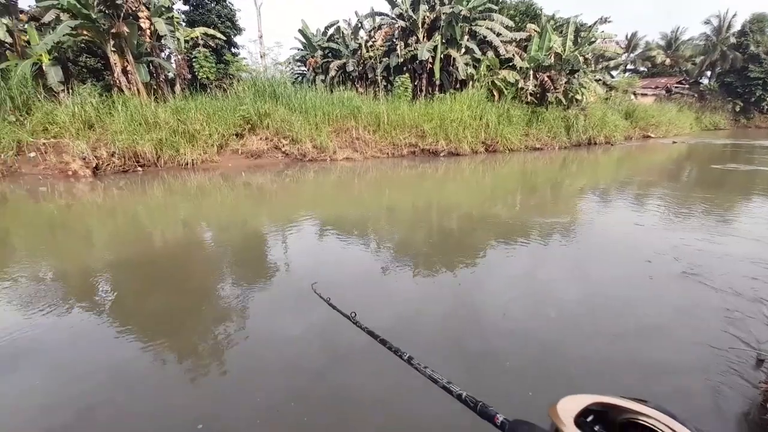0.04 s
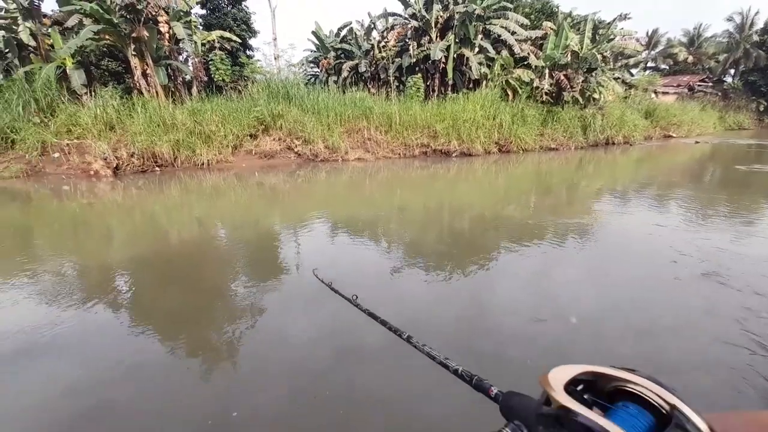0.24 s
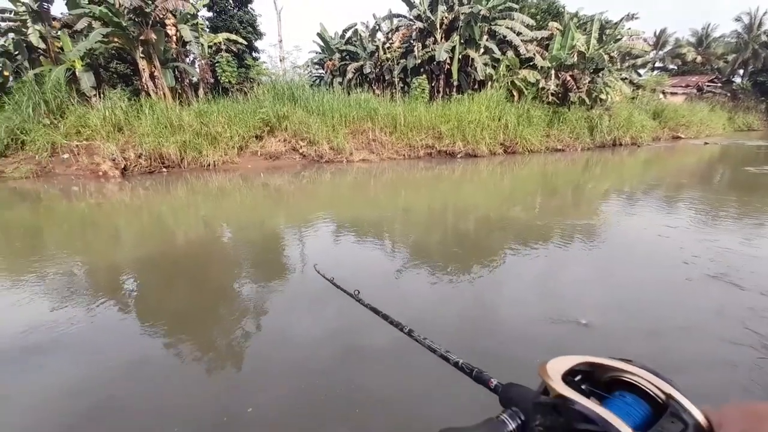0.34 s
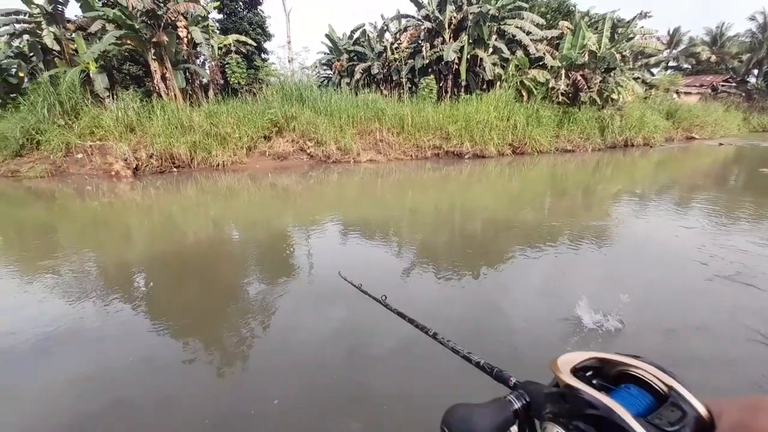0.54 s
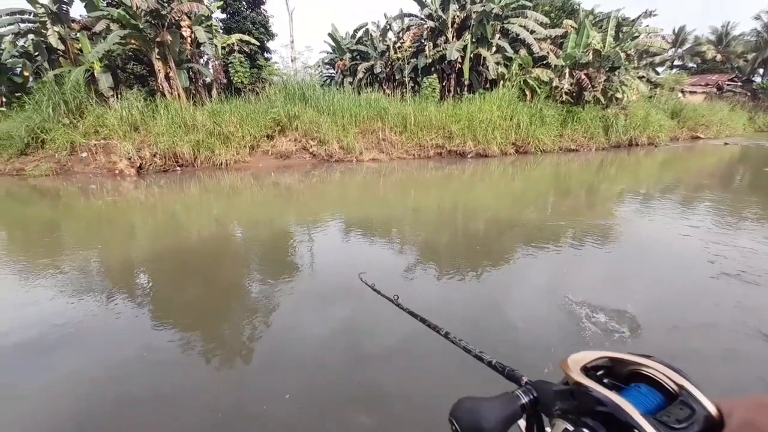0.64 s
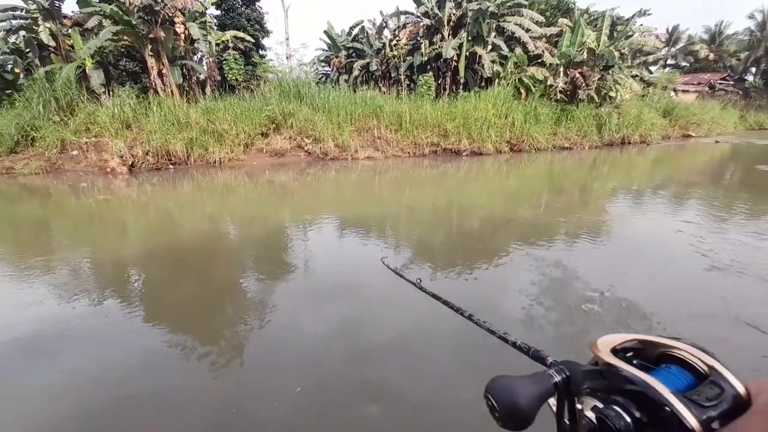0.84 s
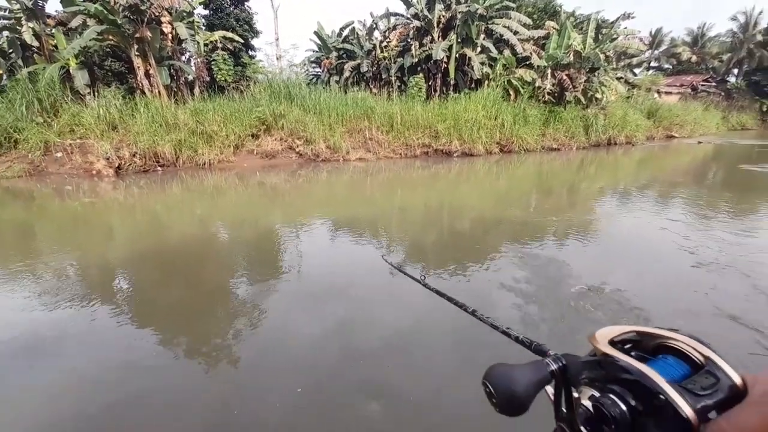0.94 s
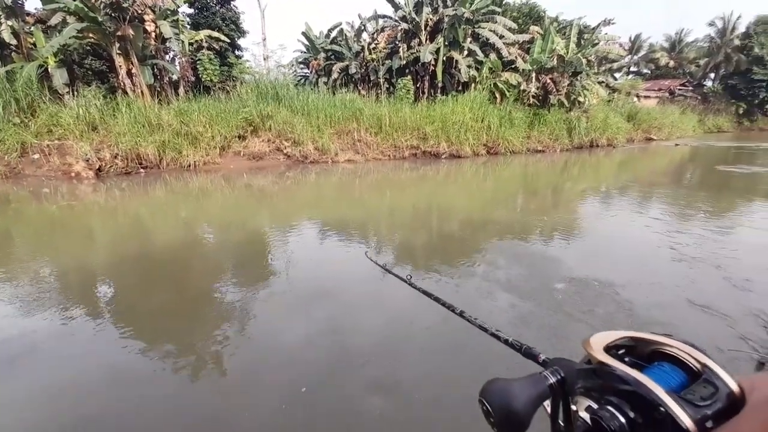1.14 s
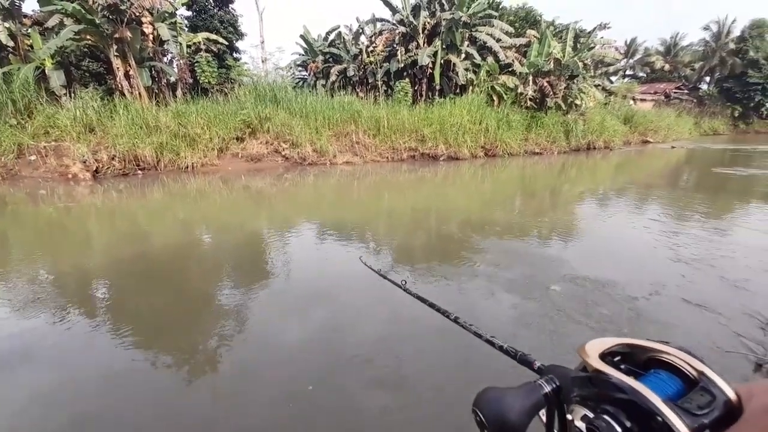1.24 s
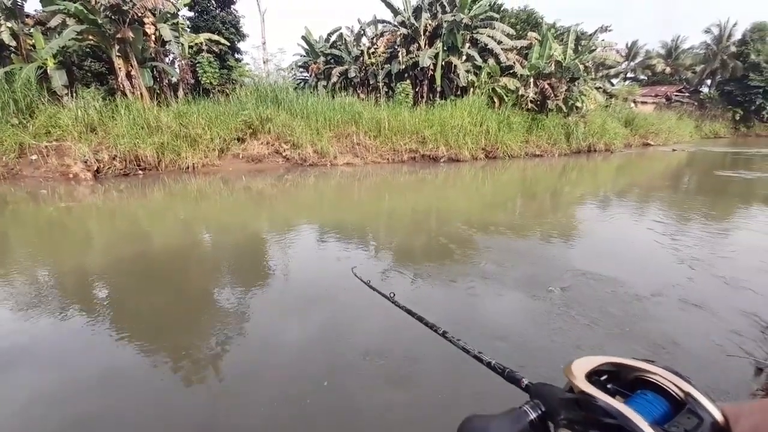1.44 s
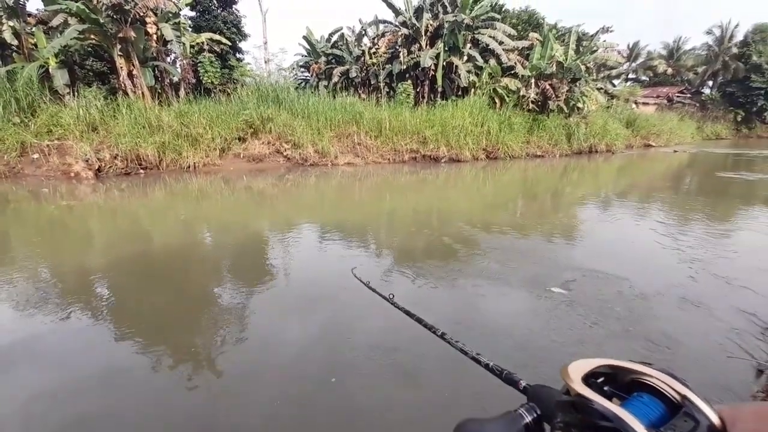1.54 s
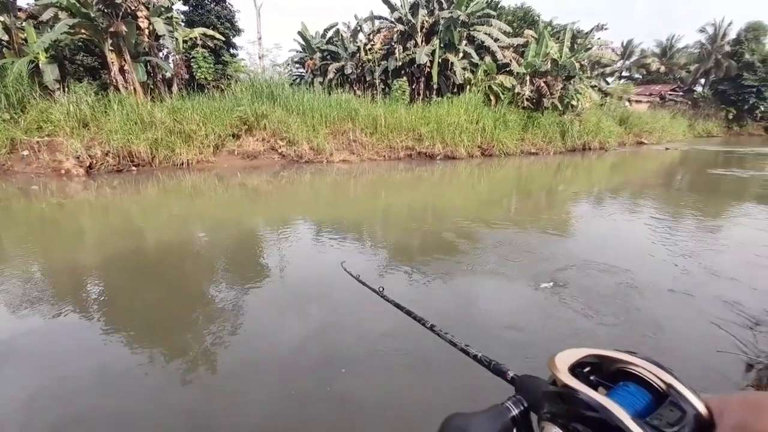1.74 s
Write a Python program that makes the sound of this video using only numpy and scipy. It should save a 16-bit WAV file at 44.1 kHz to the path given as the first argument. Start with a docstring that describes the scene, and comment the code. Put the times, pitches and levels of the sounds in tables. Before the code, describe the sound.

A hooked fish breaks the surface of a calm river a few metres to the right: quick gushes, bubbly gurgles, then pattering drops thinning out, over faint birds, insects and low outdoor rumble, in stereo.

```python
"""Beside a calm river, far birds call over an insect chorus, outdoor rumble and an early low drone.
Just before half a second a hooked fish thrashes at the surface, a few metres off to the right: filtered
noise makes its gushes, short grains its spray, gliding tones its gurgling bubbles, a click and a knock.
Drops then patter back as ticks of noise with brief rings, the spray thins out and a few thin whistles
remain. Two microphone ports hear it all; scattered echoes stand for the banks."""
import sys
import numpy as np
from scipy import signal
from scipy.fft import rfft, irfft
from scipy.io import wavfile
from scipy.ndimage import uniform_filter1d

SR = 44100
rng = np.random.default_rng(int(sys.argv[2]) if len(sys.argv) > 2 else 0)


def makeup_ratio(level_db):
    """Linear amplitude ratio for a level in decibels (20 dB per factor of ten)."""
    decades = np.asarray(level_db, float) / 20
    return 10 ** decades


def to_wav(sig):
    """Store sig (one row per channel, or 1-D mono) as 16-bit WAV at the path in sys.argv[1].

    Samples outside -1..1 are clipped; the rate is SR.
    """
    pcm = np.clip(np.atleast_2d(sig), -1, 1) * 32767
    pcm = np.round(pcm).astype(np.int16)
    wavfile.write(sys.argv[1], SR, pcm.T)  # frames by channels


N = 79380  # 1.8 s

# colour of torn water, in the spray and the gushes: f/Hz, level per Hz/dB
WATER_COLOUR = [(120, -10), (300, 10), (700, -5), (1080, -6.5), (1350, -0.5), (2200, -6.5), (3200, -9),
                (5000, -5.5), (7000, -6.5), (10000, -13), (13000, -5.5), (16000, -11.5)]


def fish():
    """All the water sounds at two microphone ports, with faint echoes off the banks."""
    # gushes from the tail; the rows at 0.578 and 0.589 s make one sustained gush:
    # peak t/s, level/dB, rise/s, t60/s, tilt/(dB per octave)
    gush_parts = [(0.487, -43, .002, 0.015, -3.5), (.513, -37, 0.0034, 0.069, -0.5),
                  (.522, -34, 0.0017, 0.028, -1.5), (0.542, -41.5, 0.00087, 0.17, -3.5),
                  (0.578, -29, 0.0063, 0.089, 0.5), (0.589, -30.5, 0.0026, 0.052, -1),
                  (0.637, -44, 0.002, 0.23, -4.5), (.702, -33.5, 0.0011, 0.11, -0.5),
                  (0.742, -38.5, 0.0048, 0.11, 0.5)]
    # drops landing, and the bright burst within the gush at 0.702 s: t/s, peak level/dB, ring f/Hz
    drops_and_burst = [(0.6342, -29, 3970), (0.7025, -24, 3530), (0.6604, -38, 3270), (0.7567, -31.5, 6770),
                       (0.783, -45, 3700), (0.807, -34, 4470), (0.8244, -37.5, 7470), (0.8789, -37, 3230),
                       (0.8954, -35, 12000), (0.9307, -33, 5760), (0.9649, -37, 7300), (0.9826, -40, 7500),
                       (1.004, -39.5, 7250), (1.028, -31.5, 8360), (1.044, -39, 7600), (1.0957, -38, 6280),
                       (1.1122, -39, 8150), (1.1595, -37.5, 5030), (1.2038, -40, 6540),
                       (1.219, -40.5, 3370), (1.2461, -42.5, 6200), (1.257, -46, 4400),
                       (1.287, -42.5, 7600), (1.3185, -46, 7600), (1.4107, -46, 4860), (1.426, -47, 5960)]
    # bubbles, with a short click at 0.492 s and a low slap knock at 0.54 s:
    # start t/s, length/s, start f/Hz, end f/Hz, level/dB
    bubbles_and_knocks = [(0.492, 0.004, 1800, 2170, -33), (0.507, 0.058, 336, 268, -43.5),
                          (0.54, 0.0074, 325, 610, -40.5), (0.577, 0.016, 450, 600, -39.5),
                          (0.578, 0.031, 1316, 1400, -39), (0.599, 0.017, 1850, 2140, -37),
                          (0.603, 0.011, 560, 560, -38.5), (0.615, 0.018, 348, 700, -37),
                          (0.622, 0.0087, 1360, 1370, -34), (0.64, 0.036, 744, 662, -40),
                          (0.67, 0.017, 464, 557, -37.5), (0.677, 0.03, 716, 728, -35.5),
                          (0.683, 0.037, 548, 642, -31.5), (0.704, 0.012, 680, 780, -27.5),
                          (0.689, 0.062, 369.2, 305, -38.5), (0.713, 0.024, 675, 754, -38),
                          (0.719, 0.0268, 950, 1153, -41), (0.769, 0.031, 657, 703, -52),
                          (0.816, 0.057, 449, 676, -46), (.938, 0.029, 600, 870, -52),
                          (0.939, 0.031, 402, 420, -52), (.956, 0.034, 884, 1240, -53),
                          (0.962, 0.013, 1975, 1990, -51), (1.154, 0.015, 1240, 1750, -53.5),
                          (1.16, 0.059, 743, 652, -62.5), (1.171, 0.034, 930, 1190, -64),
                          (1.307, 0.013, 1040, 1060, -64.5), (1.329, 0.012, 974, 1270, -55.5)]
    bank_t60_s, bank_db = 0.2, -19
    water = spray()
    for row in gush_parts:
        add(water, *gush(*row))
    for row in drops_and_burst:
        add(water, *tick_and_ring(*row))
    for row in bubbles_and_knocks:
        add(water, *glide(*row, warble=0.03))
    ports = (left_port(water), water)
    return np.array([port + makeup_ratio(bank_db) * tail(water, bank_t60_s) for port in ports])


def left_port(water):
    """The port farther from the fish: later by a phase lag, less alike in the treble, coloured anew."""
    # phase behind the right port: f/Hz, lag/rad
    phase_lag = [(0, 0), (800, 1.5), (1250, 2.5), (2300, 4), (3900, 7.5), (12300, 21.3), (22050, 40)]
    # colour of the left port: f/Hz, level/dB
    left_colour = [(300, -1), (1200, 0.5), (2500, 1.5), (5000, -4.5), (8500, -0.5), (13000, -7)]
    unlike, unlike_above_hz, scatter_t60_s = 1.6, 1900, 0.006
    hz = np.fft.rfftfreq(N, 1 / SR)
    late = irfft(rfft(water) * np.exp(-1j * over(phase_lag, hz)), N)

    t = np.arange(256) / SR
    scatter = rng.standard_normal(256) * makeup_ratio(-60 * t / scatter_t60_s)
    scatter /= np.linalg.norm(scatter)
    # droplets land in ever-changing places
    shifting = evened(uniform_filter1d(rng.standard_normal(N), size=150))
    treble = colour(late, lambda f: -20 * np.log10(1 + (unlike_above_hz / f) ** 2))
    late += unlike * signal.oaconvolve(shifting * treble, scatter)[:N]

    def balance_db(f):
        added = unlike / (1 + (unlike_above_hz / f) ** 2)
        return read(left_colour, f) - 10 * np.log10(1 + added ** 2)  # offsets the added scatter
    return colour(late, balance_db)


def gush(peak, level_db, rise, t60, tilt_db):
    """A sheet of water torn apart: lumpy hiss that rises and dies."""
    lumpy_db = 2.5
    t = np.arange(8192) / SR - 3 * rise
    lumps = makeup_ratio(lumpy_db * evened(uniform_filter1d(rng.standard_normal(8192), 50)))

    def hiss_db(hz):
        bass_cut = 10 * np.log10(1 + (500 / hz) ** 4)
        return read(WATER_COLOUR, hz) + tilt_db * np.log2(hz / 3000) - bass_cut
    hiss = colour(rng.standard_normal(8192), hiss_db)
    shape = np.where(t < 0, np.exp(-(t / rise) ** 2), makeup_ratio(-60 * t / t60))
    return peak - 3 * rise, makeup_ratio(level_db) * shape * lumps * evened(hiss)


def glide(start, length, from_hz, to_hz, level_db, warble):
    """A tone that swells, slides in pitch and dies, for bubbles, knocks and bird notes."""
    swell_shape, flutter_db = 0.65, 2.8
    u = np.arange(round(length * SR)) / (length * SR)
    wobble = evened(uniform_filter1d(rng.standard_normal(16384), size=200))[:len(u)]
    hz = (from_hz + (to_hz - from_hz) * u) * (1 + warble * wobble)
    flutter = evened(uniform_filter1d(rng.standard_normal(16384), size=120))[:len(u)]
    swell = np.sin(np.pi * u ** swell_shape) * makeup_ratio(flutter_db * flutter)
    tone = np.sin(2 * np.pi * np.cumsum(hz) / SR)
    return start, np.sqrt(2) * makeup_ratio(level_db) * swell * tone


def tick_and_ring(s, peak_db, hz):
    """A bright tick of noise and a brief, rising ring, as of a tiny bubble."""
    tick_db, tick_t60_s, tick_octaves = -2, 0.012, 1
    ring_db, ring_t60_s = -6, 0.016
    t = np.arange(1024) / SR

    def tick_colour_db(f):
        octaves_off = np.log2(f / hz / 1.48)  # the tick is centred above the ring
        return np.maximum(-6 * (octaves_off / tick_octaves) ** 2, -60)
    tick = evened(colour(rng.standard_normal(1024), tick_colour_db))
    tick = tick * makeup_ratio(tick_db - 60 * t / tick_t60_s)
    ring = np.sin(2 * np.pi * hz * t * (1 + 8 * t)) * makeup_ratio(ring_db - 60 * t / ring_t60_s)
    onset = np.minimum(t / 0.00056, 1)
    return s, makeup_ratio(peak_db) * onset * (tick + ring)


def spray():
    """Spray thrown up: hiss, countless specks of water and small pitched bubbles in the froth."""
    # spray as it rises and thins out: t/s, level/dB
    spray_level = [(.436, -100), (.441, -52.5), (.5, -48.5), (.53, -45), (.62, -41), (.69, -42.5),
                   (.74, -42.5), (.86, -46), (1.04, -53.5), (1.07, -64), (1.1, -59.5), (1.2, -59.5),
                   (1.26, -58.5), (1.35, -68), (1.5, -110)]
    hiss_share, froth_db = 0.4, -10
    hiss = rng.standard_normal(N)
    specks = grains(905, 15500, few=0.84, many=7.3, per_s=6000, spread_db=4.2)
    froth = grains(530.4, 4590, few=8.4, many=22, per_s=900, spread_db=2.5)
    mix = hiss_share * hiss + (1 - hiss_share) * specks + makeup_ratio(froth_db) * froth
    coloured = evened(colour(clumped(mix), lambda hz: read(WATER_COLOUR, hz)))
    return makeup_ratio(over(spray_level, np.arange(N) / SR)) * coloured


def grains(low_hz, high_hz, few, many, per_s, spread_db):
    """Grains of a few rising cycles, strewn at random over 24 pitches."""
    out = np.zeros(N)
    for hz in np.geomspace(low_hz, high_hz, num=24):
        cycles = few + (many - few) * rng.random()
        u = np.linspace(0, 1, int(cycles * SR / hz) + 2)
        grain = np.sin(2 * np.pi * cycles * u * (1 + 0.13 * u)) * np.sqrt(u) * (1 - u) ** 2
        grain /= np.linalg.norm(grain)
        lands = rng.random(N) < per_s / 24 / SR
        size = makeup_ratio(spread_db * np.minimum(rng.exponential(1, N), 3)) * lands
        out += np.sqrt(hz / 1000) * signal.oaconvolve(size, grain)[:N]
    return evened(out)


def clumped(x):
    """Patches of time and pitch swell and thin out, as droplets fall in clusters."""
    clump_db = 2.2
    z = signal.stft(x, nperseg=256, noverlap=192)[2]
    patches = rng.standard_normal(z.shape[::-1]).T
    patches = uniform_filter1d(patches, size=14, axis=0)
    patches = evened(uniform_filter1d(patches, size=9, axis=1))
    return signal.istft(z * makeup_ratio(clump_db * patches), nperseg=256, noverlap=192)[1][:N]


def birds():
    """Far notes blurred by the trees, and thin, steadier whistles from farther off, with echoes."""
    # bird notes: start t/s, length/s, start f/Hz, end f/Hz, level/dB
    notes = [(0, 0.023, 3110, 3160, -54.5), (0.006, 0.019, 2620, 2720, -57),
             (0.018, 0.057, 1943, 2225, -61.5), (0.069, 0.044, 2920, 3124, -47.5),
             (0.097, 0.035, 2960, 2990, -46.5), (0.144, 0.017, 2113, 2170, -50),
             (.16, 0.033, 2170, 2200, -57), (0.206, 0.027, 2450, 2775, -51),
             (0.221, 0.036, 2944, 3033, -45), (0.278, 0.045, 2126, 2210, -57),
             (0.335, 0.027, 2485, 2720, -47.5), (0.359, 0.0365, 2752, 2430, -49),
             (0.412, 0.019, 2170, 2150, -52)]
    # whistles of farther birds: start t/s, length/s, start f/Hz, end f/Hz, level/dB
    whistles = [(0.109, 0.35, 3398, 3403, -64), (1.188, 0.14, 3220, 3120, -61),
                (1.201, .07, 2300, 2605, -65.5), (1.313, 0.083, 3110, 3300, -59.5),
                (1.784, 0.021, 6160, 6460, -58)]
    warble, blur_hz, blur_depth = 0.01, 200, 0.6
    echo_t60_s, echo_db = 0.13, -8
    song = np.zeros(N)
    for row in notes:
        add(song, *glide(*row, warble))
    blur = colour(rng.standard_normal(N), lambda hz: -20 * np.log10(1 + (hz / blur_hz) ** 2))
    song *= 1 + blur_depth * evened(blur)
    for row in whistles:
        add(song, *glide(*row, warble / 2))
    # the direct song reaches the right port 7 samples later
    return np.array([np.roll(song, 7 * side) + makeup_ratio(echo_db) * tail(song, echo_t60_s)
                     for side in range(2)])


def insects():
    """A far chorus: noise bands with a buzzing level, unrelated at the two ports."""
    # chorus bands: centre f/Hz, width/Hz, level/dB
    chorus = [(7600, 630, -63), (8240, 530, -71), (10880, 1150, -72)]
    buzz_hz, buzz_depth = 118.5, 0.068
    t = np.arange(N) / SR
    out = np.zeros((2, N))
    for centre_hz, width_hz, level_db in chorus:
        def band_db(hz):
            return np.maximum(-6 * ((hz - centre_hz) / width_hz * 2) ** 2, -80)
        for side in range(2):
            band = evened(colour(rng.standard_normal(N), band_db))
            buzz = 1 + buzz_depth * np.sin(2 * np.pi * (buzz_hz * t + rng.random()))
            out[side] += makeup_ratio(level_db) * band * buzz
    return out


def air():
    """Outdoor rumble, a low drone and faint hiss: noise shaped frame by frame, with drifting patches."""
    # colour of the air before scaling: f/Hz, level per Hz/dB
    air_colour = [(15, -60), (30, -51), (42, -18), (55, 6), (75, -8), (105, 1), (140, -6.5), (200, -13.5),
                  (300, -18.5), (520, -32.5), (900, -38.5), (1840, -43.5), (4000, -44), (6300, -43),
                  (15800, -40.5)]
    # how alike the two ports are: f/Hz, likeness (1 = same)
    likeness = [(60, 0.85), (180, 0.72), (550, 0.49), (1650, 0.063), (4970, 0.19), (15000, -0.068)]
    # lean between the ports: f/Hz, left minus right/dB
    side_lean = [(60, -1.8), (240, -1.1), (950, 0.82), (3770, -0.85), (15000, -0.28)]
    # change of the rumble below about 200 Hz: t/s, level/dB
    rumble = [(0, 0), (.3, 1), (.6, 3.5), (.95, 2), (1.4, 3.5), (1.6, -3), (1.8, -2)]
    # change of the drone band: t/s, level/dB
    drone = [(0, 11.5), (.15, 13.5), (.35, 11.5), (.5, -16), (1, -2.5), (1.3, 2), (1.8, 0)]
    drone_hz, drone_octaves, patchy_db = 474, 0.59, 3
    level_db = -49.5  # both ports averaged, before rumble and drone change
    left_lag_s = 0.00025  # up to 300 Hz; the phase stays fixed above
    frames, hz = N // 512 + 5, np.fft.rfftfreq(2048, 1 / SR)
    t = np.arange(frames) * 512 / SR
    a, b, c, d, patches = rng.standard_normal((frames, 1025, 5)).T
    patches = evened(uniform_filter1d(uniform_filter1d(patches, 16, 0), 6, 1))

    same = np.clip(read(likeness, hz), -0.5, 1)[:, None]
    left, other = a + 1j * b, c + 1j * d
    right = same * left + np.sqrt(1 - same ** 2) * other
    z = np.array([left, right]) / np.sqrt(1 + same)

    band = np.exp(-(np.log2((hz + 1) / drone_hz) / drone_octaves) ** 2)[:, None]
    low = 1 / (1 + (hz / 200) ** 4)[:, None]
    lean = read(side_lean, hz)[:, None] / 2
    z *= makeup_ratio(read(air_colour, hz)[:, None] + patchy_db * (1 - low) * patches + np.array([lean, -lean]))
    z[0] *= np.exp(-2j * np.pi * np.minimum(hz, 300) * left_lag_s)[:, None]

    middle = signal.istft(z.mean(0), nperseg=2048, noverlap=1536)[1]
    scale = makeup_ratio(level_db) / np.sqrt(np.mean(middle ** 2))
    z *= makeup_ratio(band * over(drone, t) + low * over(rumble, t))
    return scale * signal.istft(z, nperseg=2048, noverlap=1536)[1][:, :N]


def tail(x, t60):
    """Scattered echoes: decaying noise taps of energy 1, with a 6 ms onset."""
    t = np.arange(round(SR / 2)) / SR
    taps = rng.standard_normal(len(t)) * makeup_ratio(-60 * t / t60) * np.minimum(t / 0.006, 1)
    return signal.fftconvolve(x, taps / np.linalg.norm(taps))[:N]


def colour(x, db_of):
    """Filters by a gain in dB given as a function of Hz."""
    hz = np.fft.rfftfreq(len(x), 1 / SR) + 1  # 1 Hz up, to keep off zero
    return irfft(rfft(x) * makeup_ratio(db_of(hz)), len(x))


def evened(x):
    """Scales to rms 1."""
    return x / np.sqrt(np.mean(x ** 2) + 1e-20)


def read(points, hz):
    """Reads a table on a log-frequency axis."""
    f, value = np.transpose(points)
    return np.interp(np.log(hz + 1), np.log(f + 1), value)


def over(points, x):
    """Reads a table on a linear axis of time or frequency."""
    return np.interp(x, *np.transpose(points))


def add(mix, s, sound):
    """Adds a sound to the mix at time s in seconds."""
    part = mix[max(round(s * SR), 0):][:len(sound)]
    part += sound[:len(part)]


def scene():
    """Fish near by, then birds, insects and air behind it."""
    return fish() + birds() + insects() + air()


def low_pass(x):
    """Removes everything above the highest recorded frequency."""
    return signal.sosfilt(signal.butter(12, 15940, fs=SR, output="sos"), x)


def record(dry):
    """The microphone cuts the deepest bass, below 40 Hz."""
    bass_cut = signal.butter(3, 40, "high", fs=SR, output="sos")
    return low_pass(signal.sosfilt(bass_cut, dry))


dry = scene()
out = record(dry)
to_wav(out)
```